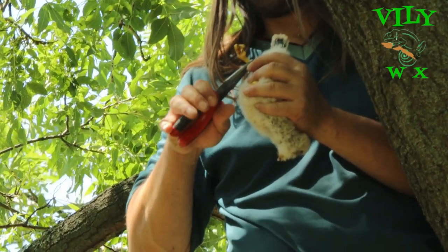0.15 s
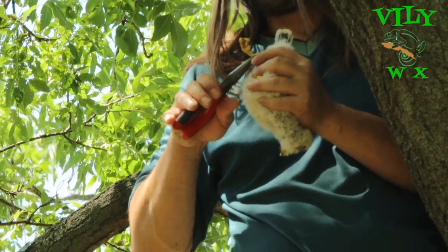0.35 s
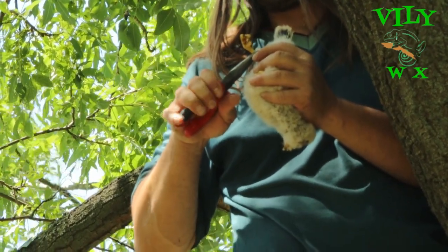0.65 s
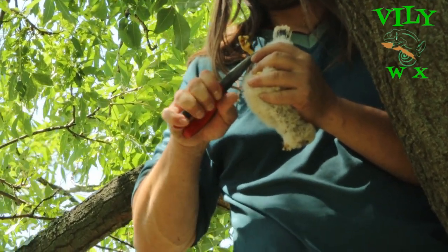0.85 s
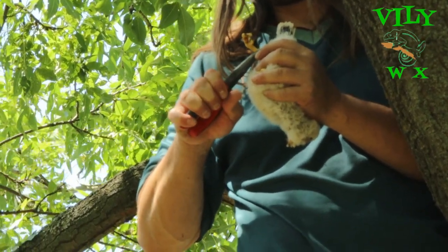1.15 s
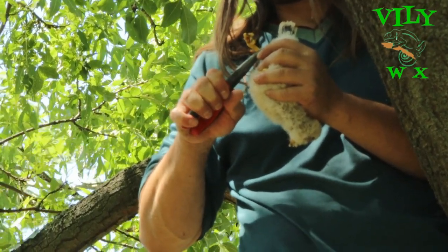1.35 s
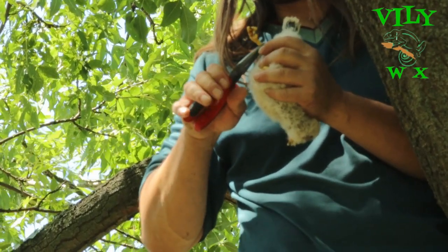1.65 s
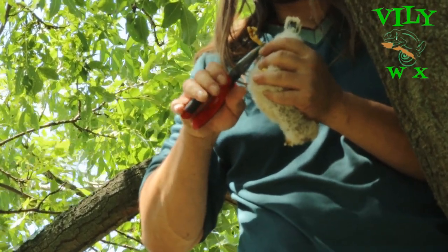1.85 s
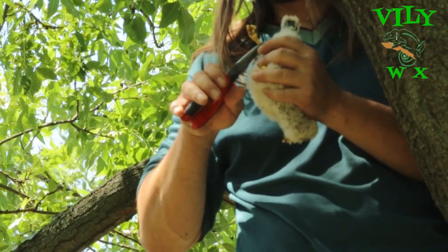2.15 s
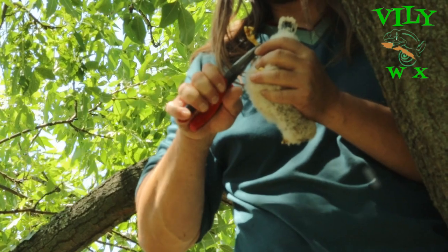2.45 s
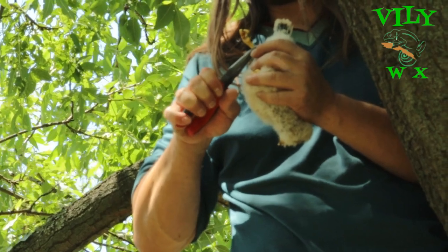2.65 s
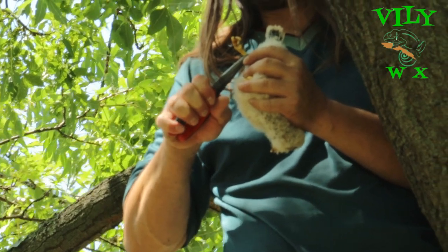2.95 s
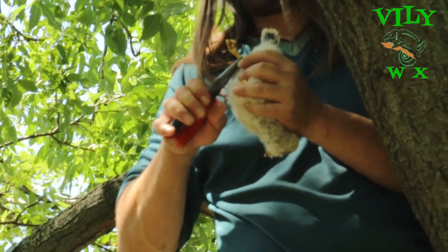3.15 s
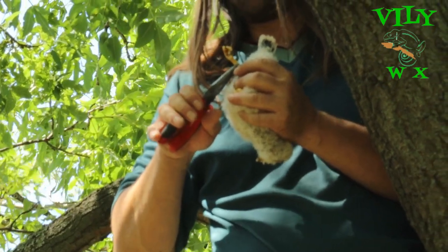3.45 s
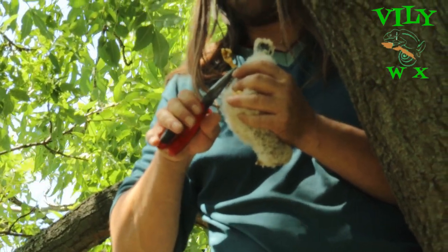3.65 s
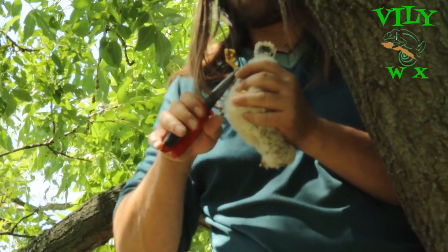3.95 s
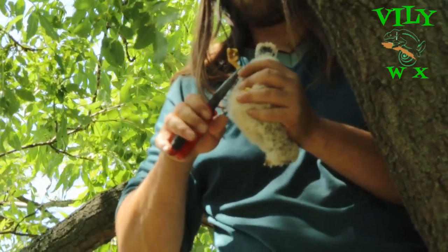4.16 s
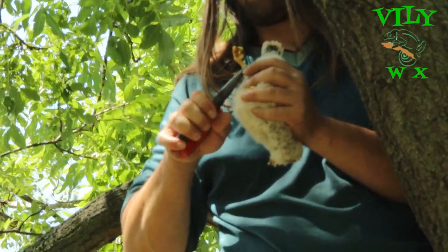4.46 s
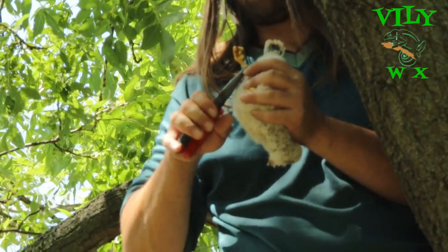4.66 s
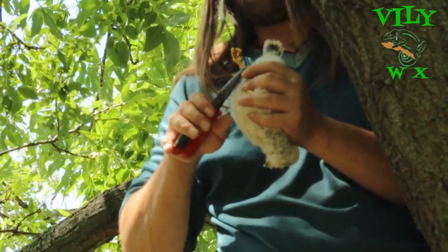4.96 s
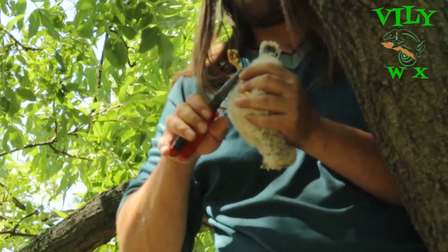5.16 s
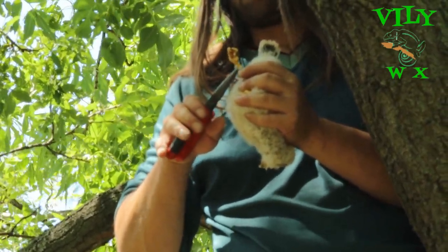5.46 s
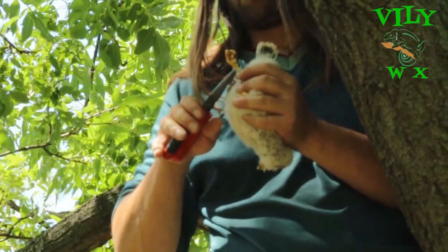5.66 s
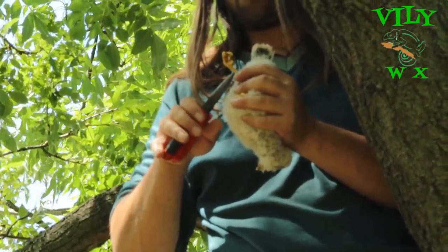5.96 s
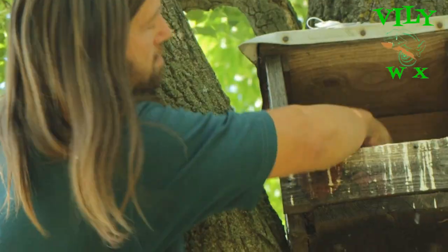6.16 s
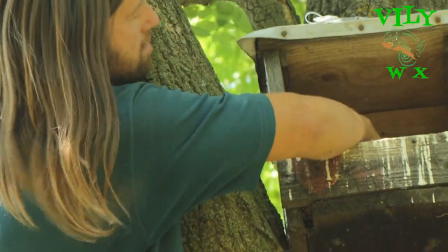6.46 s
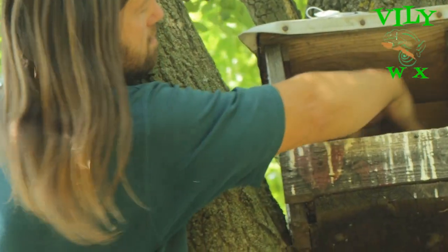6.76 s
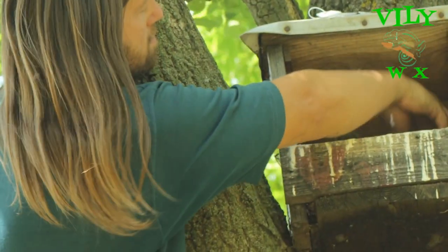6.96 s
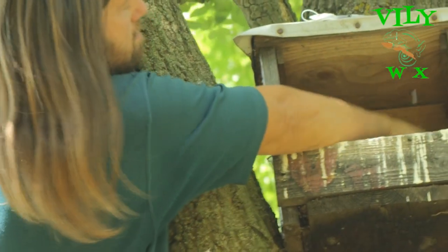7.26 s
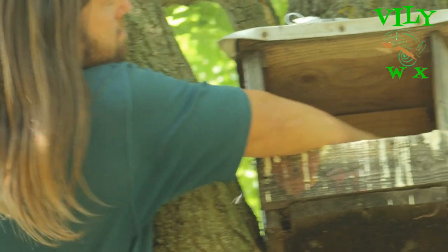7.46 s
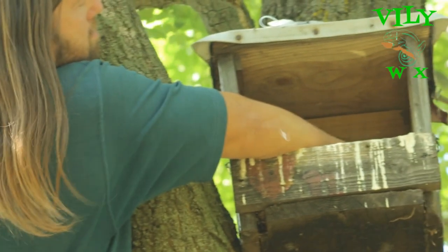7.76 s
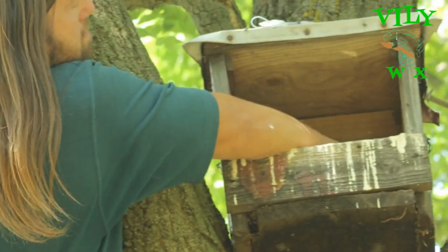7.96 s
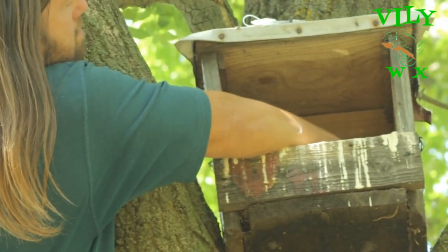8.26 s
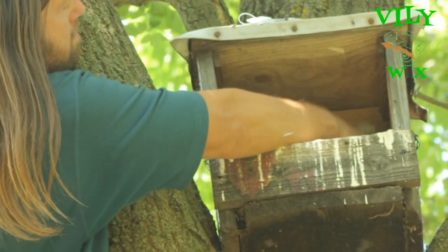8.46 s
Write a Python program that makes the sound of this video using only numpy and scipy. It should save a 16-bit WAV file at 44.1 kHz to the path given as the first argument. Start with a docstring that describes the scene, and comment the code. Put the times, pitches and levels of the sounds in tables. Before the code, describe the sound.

Rapid shrill squeals from a handled raptor chick, in separate runs with quiet gaps, amid faint rustle, taps, microphone gusts and steady summer insect hiss.

```python
"""Kestrel chicks in a tree

Two chicks squeal in short runs while handled at a nest box: harmonics slide up low, break into a high arch, fall back.
Echoes and decaying noise are the trunk and canopy. Ringing modes, noise bursts and slips are the taps, bark and cloth.
Gated low noise and single pulses are gusts on the microphone. Shaped noise gives a wavering insect hiss, open air,
a faint whine, and a faint treble hiss, mostly 13-16 kHz, that pulses quickly and dips unevenly.
"""
import sys
import numpy as np
from scipy import signal
from scipy.fft import rfft, irfft, next_fast_len
from scipy.io import wavfile
from scipy.ndimage import uniform_filter1d

SR = 44100
rng = np.random.default_rng(int(sys.argv[2]) if len(sys.argv) > 2 else 0)


def store_wav(level_fs):
    """Save 16-bit WAV to argv[1]."""
    pcm = np.round(np.clip(np.atleast_2d(level_fs), -1, 1) * 32767)
    wavfile.write(sys.argv[1], SR, pcm.T.astype(np.int16))


N = 379701
TIME = np.arange(N) / SR
CUTOFF_HZ = 15900


def from_db(db):
    """Decibels to gain."""
    return 10 ** (np.asarray(db) / 20)


def rms_one(x):
    """Scale to unit power."""
    return x / np.sqrt(np.mean(x ** 2) + 1e-20)


def along(rows, t):
    """Each column of a curve, read at times t."""
    s, *columns = np.transpose(rows)
    return [np.interp(t, s, c) for c in columns]


def at_hz(points, hz):
    """A spectrum read on a log-frequency axis."""
    f, value = np.transpose(points)
    return np.interp(np.log(np.maximum(hz, 1)), np.log(f), value)


def panned(x, pan_db):
    """Place a sound between left and right at constant power; positive leans left."""
    ratio = from_db(pan_db)
    return np.array([x * ratio, x]) * np.sqrt(2 / (1 + ratio ** 2))


def drift(rate, size):
    """Random wander about zero: straight lines between normal draws, rate draws a second."""
    steps = np.arange(size) * rate / SR
    knots = np.random.default_rng(rng.integers(2 ** 31)).standard_normal(int(steps[-1]) + 2)
    return np.interp(steps, np.arange(len(knots)), knots)


def coloured(x, spectrum):
    """Give a sound a spectrum; unit power."""
    size = 2 ** 19
    gain = from_db(at_hz(spectrum, np.fft.rfftfreq(size, 1 / SR)))
    return rms_one(irfft(rfft(x, size) * gain)[..., :N])


def course(t, width_s, break_s, drop_s, low_share, lowest_share, low_db, swell_db, release_db_per_s):
    """One arch of tension gives the share of the top pitch and the level in dB, t seconds from the top."""
    tension = 1 / (1 + (t / width_s) ** 2)
    # the high register holds from break_s before the top to drop_s after it
    low = uniform_filter1d(1.0 * ((t < -break_s) | (t > drop_s)), size=60)
    share = np.maximum(tension * (1 - low * (1 - low_share)), lowest_share)
    release_db = release_db_per_s * np.maximum(t - drop_s, 0)
    return share, swell_db * (tension - 1) + low_db * low - release_db


ONSET_JITTER = .07  # share of the pitch
HOARSE_BELOW_HZ, HOARSE_DB_PER_HZ = 1900, .06  # calls that fall short of this pitch flutter more
LOW_OCTAVE_DB = -6  # even harmonics in the low register


def chick(calls, arch, throat, jitter, low_jitter, wander, shimmer_db, rasp_db, slack_db, lag_ms):
    """Harmonics of the syrinx sweep through a fixed throat resonance; the low register is the rougher."""
    out = np.zeros((2, N))
    for s, pitch_hz, level_db, length, lift_db, pan_db in calls:
        span = np.flatnonzero(abs(TIME - round(s, 2)) < .08)
        size = len(span)
        t = (TIME[span] - s) / length
        share, swell_db = course(t, **arch)
        # away from the top of the arch the membrane is slack and flutters more
        slack = np.clip((.99 - share) / .1, 0, 1)
        hoarse = from_db(HOARSE_DB_PER_HZ * np.clip(HOARSE_BELOW_HZ - pitch_hz, 0, 100))
        flutter = (jitter * hoarse + low_jitter * slack) * drift(1400, size)
        unsteady = flutter + wander * drift(90.0, size)
        # the voice starts as a croak before it settles on a pitch
        croak = np.clip(-t / arch["break_s"] - 1.3, 0, 1)
        f0 = pitch_hz * share * (1 + unsteady + ONSET_JITTER * croak * drift(2200, size))
        phase = 2 * np.pi * np.cumsum(f0) / SR
        voice = 0
        for k in range(1, 11):
            overtone = np.clip((k * f0 - 4500) / 1000, 0, 1)
            gain_db = at_hz(throat, k * f0) + overtone * (lift_db + slack_db * slack)
            gain_db = gain_db + shimmer_db * (1 + overtone) * drift(418.8, size)
            # the low register favours odd harmonics
            gain_db = gain_db + LOW_OCTAVE_DB * (k % 2 == 0) * (share < .8)
            gain = from_db(gain_db) * (k * f0 < CUTOFF_HZ)
            # the strong low partials carry the direction, the overtones sit in the middle
            late = 2 * np.pi * k * f0 * lag_ms / 1000 * (1 - overtone)
            partial = np.array([np.sin(k * phase - late), np.sin(k * phase)])
            voice = voice + partial * panned(gain, pan_db * (1 - overtone))
        fade = signal.windows.tukey(size, .4)
        out[:, span] += np.sqrt(2) * voice * from_db(level_db + swell_db) * fade
    # turbulent air hisses through the same throat for as long as the voice sounds
    effort = np.sqrt(np.maximum(uniform_filter1d(out ** 2, size=300), 0))
    return out + from_db(rasp_db) * effort * coloured(rng.standard_normal((2, N)), throat)


# squeals of the nearer chick: (time of the arch top [s], top pitch before flutter [Hz], relative level [dB],
# length factor [ratio], overtone lift [dB], left over right [dB])
NEAR_CALLS = [(.022, 1840, -35, 1.16, 2, -3), (.124, 1906, -21, .95, -1.5, -3),
              (.380, 1900, -20.5, 0.87, -4, -1), (1.760, 1893, -22.5, 1.06, 1.5, -2.5),
              (1.950, 1833, -24, 0.99, -4, -3), (2.217, 1804, -22.5, .9, -6, -2),
              (2.742, 1740, -47, 1, -5, 0), (4.267, 1808, -25, 1.06, 0.5, -2),
              (4.440, 1862, -21.5, 1.0, 0, -5), (4.652, 1808, -23, .9, -2.5, -2),
              (4.917, 1833, -22.5, 0.98, -2.5, -4), (5.118, 1877, -21.5, 1.01, -2.5, -4),
              (5.365, 1843, -22.5, 1.04, 0, -3), (6.247, 1927, -23, 0.99, 1, -3.5),
              (6.448, 1942, -21.5, 1.15, -1, -2), (6.637, 1968, -22, 1.1, 1, -1),
              (6.916, 1833, -23.5, 1.24, -4.5, -1), (7.812, 1968, -20.5, 1.11, 1, -4),
              (8.005, 1914, -20.5, 1.01, -1.5, -3), (8.232, 1903, -20.5, 1.3, 0, -1.5),
              (8.563, 1924, -22, 1.21, 3, -3)]
# its tension arch, before the length factor: widths [s], pitch shares [ratio], levels [dB], release [dB/s]
NEAR_ARCH = dict(width_s=.071, break_s=.017, drop_s=.025, low_share=.72, lowest_share=.48, low_db=0, swell_db=62, release_db_per_s=1200)
# its throat and beak resonance: (frequency [Hz], relative gain [dB])
NEAR_THROAT = [(1000, -24), (1900, -23), (2500, -11.5), (3100, -5), (3600, -2), (4000, 3), (4700, -7.5),
               (5700, -19), (7600, -10), (9500, -18), (11500, -23.5), (14000, -32)]


def near_chick():
    """The strong voice: its overtones weaken when the membrane is slack."""
    return chick(NEAR_CALLS, NEAR_ARCH, NEAR_THROAT, jitter=.0055, low_jitter=0.019, wander=0.0042,
                 shimmer_db=2.0, rasp_db=-15, slack_db=-6, lag_ms=0.088)


# squeals of the second chick: (time of the arch top [s], top pitch before flutter [Hz], relative level [dB],
# length factor [ratio], overtone lift [dB], left over right [dB])
THIN_CALLS = [(3.735, 2120, -37.5, 1.3, 0, -1), (3.877, 2150, -37, 1.02, 0, 5),
              (4.033, 2216, -38, 0.96, 0, 4), (4.186, 2220, -37.5, 1.03, 0, 1.5),
              (4.350, 2127, -44, 0.97, 0.009, 5), (4.512, 2190, -42, 1.17, 0, 8),
              (4.680, 2127, -43.5, 0.99, 0, 3), (4.875, 2195, -46.5, 0.97, 0, 18),
              (7.958, 2110, -40, 0.99, 0, -1), (8.125, 2150, -46.5, 1.1, 0, 6),
              (8.460, 2167, -45, 1.6, 0, 0)]
# its tension arch, before the length factor: widths [s], pitch shares [ratio], levels [dB], release [dB/s]
THIN_ARCH = dict(width_s=.047, break_s=.019, drop_s=.022, low_share=.85, lowest_share=.58, low_db=-1.5, swell_db=41.5, release_db_per_s=2500)
# its throat and beak resonance: (frequency [Hz], relative gain [dB])
THIN_THROAT = [(1200, -5), (2100, -1), (2800, 7), (3500, 12), (4300, 8.5), (5200, -6), (6400, -7),
               (8500, -13), (11000, -37), (14000, -52)]


def thin_chick():
    """A thinner, higher voice: its overtones gain a little when the membrane is slack."""
    return chick(THIN_CALLS, THIN_ARCH, THIN_THROAT, jitter=.0032, low_jitter=0.0043, wander=0.0041,
                 shimmer_db=2.5, rasp_db=-23, slack_db=2, lag_ms=-0.19)


def off_axis(x, loss_db):
    """The beak beams its overtones away, so they arrive mostly by reflection."""
    body = signal.sosfiltfilt(signal.butter(4, 5200, fs=SR, output="sos"), x)
    return body + from_db(loss_db) * (x - body)


# echoes off trunk, box and limbs: (left delay [ms], right delay [ms], level [dB])
ECHOES = [(2.9, 3.0, -21), (6.7, 6.4, -20), (12.3, 12.8, -20), (19.4, 18.7, -21), (31, 29.5, -21),
          (43, 45, -23)]
CANOPY_DB, CANOPY_T60_S = -12.5, .22  # scatter from the leaves
FAR_DB, FAR_T60_S = -19.5, .65  # far tail


def tree(x):
    """A few echoes off nearby wood, dense scatter from the leaves and a faint far tail."""
    t = np.arange(SR) / SR
    response = np.zeros((2, SR))
    for level_db, t60 in (CANOPY_DB, CANOPY_T60_S), (FAR_DB, FAR_T60_S):
        build_up = 1 - np.exp(-t / 0.04)
        scatter = rng.standard_normal((2, SR)) * from_db(-60 * t / t60) * build_up
        response += from_db(level_db) * rms_one(scatter) / np.sqrt(SR)
    for left_ms, right_ms, level_db in ECHOES:
        delays = [int(left_ms * SR / 1000), int(right_ms * SR / 1000)]
        response[[0, 1], delays] += from_db(level_db)
    return signal.fftconvolve(x, response, axes=1)[:, :N]


# handling taps: (time [s], relative peak [dB], left over right [dB])
TAPS = [(3.49, -44, 9), (3.71, -38.5, 8), (4.836, -46, 7), (4.875, -53, 2), (4.949, -41, 11),
        (5.721, -23, 9), (6.376, -44, 9)]
# ringing modes of a tap: (frequency [Hz], relative level before random spread [dB], t60 [s])
TAP_MODES = [(260, -15, 0.02), (450, -4, 0.031), (890, 0, 0.0093), (1230, 3, 0.013), (1610, -1, 0.0078),
             (2580, -14, 0.0041), (5800, -6.5, 0.0029)]


def taps(trim_db):
    """Dry contacts: damped modes, each tap struck slightly differently, that die within a few cycles."""
    out, t = np.zeros((2, N)), np.arange(SR // 20) / SR
    for s, peak_db, pan_db in TAPS:
        ring = 0
        for k, (hz, db, t60) in enumerate(TAP_MODES):
            decay = from_db(db + 2 * rng.normal() - 60 * t / t60)
            ring = ring + decay * np.sin(2 * np.pi * hz * t) * (-1) ** k
        at = round(s * SR)
        out[:, at:at + len(t)] += panned(from_db(peak_db + trim_db) * ring / abs(ring).max(), pan_db)
    return out


# sharp ticks of bark: (time [s], peak [dB])
TICKS = [(1.536, -27), (3.489, -27), (4.952, -21.5)]


def ticks(t60_s):
    """Bits of bark snap in bright, very short noise bursts."""
    envelope = 0
    for s, peak_db in TICKS:
        envelope = envelope + from_db(peak_db - 60 * abs(TIME - s) / t60_s) * (TIME >= s)
    return envelope * rng.uniform(-1, 1, N)


# cloth rubs on bark: (time at the middle [s], half length [s], level [dB])
RUBS = [(3.347, 0.15, -55), (4.836, 0.16, -52.5), (6.38, .04, -46.5)]
# faint rustle between the rubs: (time [s], level [dB])
FIDGET = [(0, -77), (4.6, -58.5), (8.61, -55)]
# colour of the cloth: (frequency [Hz], relative level [dB])
RUB = [(200, -18), (400, 2.5), (750, 1.5), (1400, -11), (3000, -10), (9000, -26)]


def rustle(grains_per_s, grain_db):
    """Cloth catches on bark in tiny uneven slips; each rub swells and fades."""
    strength = from_db(grain_db * np.minimum(rng.exponential(1, N), 4))
    slips = (rng.random(N) < grains_per_s / SR) * strength
    force = from_db(along(FIDGET, TIME)[0])
    for s, half_s, db in RUBS:
        force = force + from_db(db) * np.exp(-((TIME - s) / half_s) ** 2)
    return force * coloured(slips * rng.standard_normal((2, N)), RUB)


# gusts, mostly stronger in one port: (start [s], length [s], relative level [dB], left over right [dB])
GUSTS = [(0.0, 0.11, -28, 16), (.14, .06, -38.5, 10), (0.359, 0.13, -39, 3), (.61, 0.017, -48, -1),
         (0.732, 0.23, -40, 5.5), (0.976, 0.13, -46, 19), (1.70, 0.36, -47, -14), (1.802, 0.15, -42, -19),
         (2.278, 0.022, -47, -11), (2.599, 0.2, -42, -19), (2.908, 0.15, -38, -18),
         (3.191, 0.027, -47.5, -18), (3.908, 0.053, -40.5, -18), (4.028, 0.049, -39.5, -15),
         (4.277, 0.057, -46, -23), (5.98, 0.028, -51, 18), (6.244, 0.66, -58, 11), (6.921, 0.28, -46.5, 3),
         (7.45, 0.13, -55, -10), (7.792, .04, -45, -8), (7.924, 0.68, -54, 13)]
# colour of the turbulence: (frequency [Hz], relative level [dB])
WIND = [(15, -44), (25, -11), (64, 1), (118, 3.5), (172, -2), (367, -18.5), (430, -16.5), (512, -30),
        (600, -38), (780, -55), (1320, -120)]
# single buffets: (time [s], relative peak [dB], pitch [Hz], left over right [dB])
BUFFETS = [(0.016, -20.5, 168, 18.5), (0.06, -9, 129, 23), (0.52, -27.5, 170, 11), (0.916, -28.5, 153, 10),
           (0.954, -28, 135, 19), (1.884, -24, 145, -22), (7.13, -23, 134, -20)]
GUST_ATTACK_S, GUST_RELEASE_S = 0.01, 0.013


def wind(lump_db, low_cut_hz):
    """Gusts rise, hold and die as lumpy turbulence on each port, with single eddies that push and then pull."""
    power = np.zeros((2, N))
    for s, length_s, level_db, pan_db in GUSTS:
        # zero or less inside the gust, growing outside it
        outside = np.maximum((s - TIME) / GUST_ATTACK_S, (TIME - s - length_s) / GUST_RELEASE_S)
        power += panned(from_db(level_db) * np.exp(-np.clip(outside, 0, 20)), pan_db) ** 2
    own, shared = rng.standard_normal((2, N)), rng.standard_normal(N)
    lumps = from_db(lump_db * drift(60, N))
    out = np.sqrt(power) * coloured((own + 0.54 * shared) * lumps, WIND)
    for s, peak_db, hz, side_db in BUFFETS:
        u = 2 * np.pi * hz * (TIME - s)
        out += panned(-from_db(peak_db) * u * np.exp((1 - u ** 2) / 2), side_db)
    return signal.sosfilt(signal.butter(2, low_cut_hz, "high", fs=SR, output="sos"), out)


# stereo balance of the surroundings: (frequency [Hz], left over right [dB])
LEAN = [(60, -3.5), (150, 1), (380, -4.5), (950, 12), (2380, -2.5), (5980, -2.5), (15000, 1.5)]
# stereo spread of the surroundings: (frequency [Hz], side minus mid [dB])
WIDTH = [(60, -17), (99, -5), (160, -6.5), (270, -7.5), (450, -5.5), (740, 4.5), (1220, 1), (2010, 6.5),
         (3330, 0.5), (5500, 3.5), (9080, -11.5), (15000, -18.5)]


def ambient(spectrum):
    """Steady stereo noise arriving from all round; unit power."""
    size = next_fast_len(N)
    hz = np.fft.rfftfreq(size, 1 / SR)
    mid, side = rfft(rng.standard_normal((2, size)))
    width = from_db(at_hz(WIDTH, hz))
    pair = np.array([mid + width * side, mid - width * side]) / np.sqrt(1 + width ** 2)
    tilt = panned(from_db(at_hz(spectrum, hz)), at_hz(LEAN, hz))
    return rms_one(irfft(pair * tilt, size)[:, :N])


# colour of the treble hiss: (frequency [Hz], relative density [dB])
TREBLE_HISS = [(9000, -53), (11500, -21), (12700, -12.5), (14000, 0.5), (15500, 2), (16000, -2)]
DIP_UNEVEN = .2  # share of the dip rate


def treble_hiss(level_db, dips_per_s, dip_db, pulses_per_s, pulse_depth, waver_db):
    """A faint treble hiss, mostly 13-16 kHz, that pulses quickly and dips unevenly."""
    dips = np.cumsum(dips_per_s * (1 + DIP_UNEVEN * drift(5.1, N))) / SR
    pulses = np.cumsum(pulses_per_s * (1 + 0.016 * drift(2.7, N))) / SR
    dip = (.5 + .5 * np.cos(2 * np.pi * dips)) ** 5
    swing = from_db(waver_db * drift(28, N) - dip_db * dip)
    swing = swing * (1 + pulse_depth * np.cos(2 * np.pi * pulses))
    return from_db(level_db) * rms_one(swing * ambient(TREBLE_HISS))


# colour of the insect hiss: (frequency [Hz], relative density [dB])
INSECTS = [(3000, -24), (3700, -6.5), (4300, 6.5), (5000, 7), (5500, 0), (6100, -6.5), (7500, -9),
           (9000, -12.5), (11000, -13.5), (16000, -15)]


def insects(level_db, waver_db):
    """A high band of noise like summer insects, steady but for a gentle waver in level."""
    return from_db(level_db + waver_db * drift(25, N)) * ambient(INSECTS)


# faint distant whine: (frequency [Hz], width [Hz], level [dB])
DRONE = [(335.3, 116, -62.5), (621, 61, -61), (1152, 21, -67.5)]


def whine():
    """Noise through narrow resonances, the same on both sides."""
    out = np.zeros(N)
    for hz, width_hz, level_db in DRONE:
        b, a = signal.iirpeak(hz, hz / width_hz, SR)
        out += from_db(level_db) * rms_one(signal.lfilter(b, a, rng.standard_normal(N)))
    return out


# colour of the outdoor air: (frequency [Hz], relative density [dB])
AIR = [(18, -37), (30, -13), (69, -4), (298, -5.5), (342, 3), (378, -6.5), (479, -6), (608, -3), (684, -9),
       (1080, -10), (1170, -4.5), (1340, -13), (2290, -4), (3400, -10), (4420, -48), (7480, -120)]


def open_air(level_db):
    """The outdoor floor: steady, mostly low noise."""
    return from_db(level_db) * ambient(AIR)


# random flutter of the echoes and tail: depth, draws per second
TAIL_FLUTTER_DB, TAIL_FLUTTER_RATE = 2.5, 380


def scene():
    """Both chicks in the tree, with handling, wind, insects, treble hiss and the outdoor floor."""
    voices = near_chick() + thin_chick()
    # the reflections come back broken and fluttering
    wander = np.array([drift(TAIL_FLUTTER_RATE, N), drift(TAIL_FLUTTER_RATE, N)])
    flutter = from_db(TAIL_FLUTTER_DB * wander)
    birds = off_axis(voices, loss_db=-10.5) + flutter * tree(voices)
    handling = taps(trim_db=4.0) + ticks(t60_s=0.0055) + rustle(grains_per_s=1100, grain_db=2.5)
    gusts = wind(lump_db=4.0, low_cut_hz=50)
    treble = treble_hiss(level_db=-44.5, dips_per_s=7.2, dip_db=4.5, pulses_per_s=71,
                         pulse_depth=0.26, waver_db=2.0)
    background = insects(level_db=-43.19, waver_db=1.5) + whine() + open_air(level_db=-48.64)
    return birds + handling + gusts + treble + background


def record(dry):
    """The stereo image narrows in the treble, and the top is cut steeply."""
    mid, side = dry.mean(0), (dry[0] - dry[1]) / 2
    soft_side = signal.sosfiltfilt(signal.butter(3, 7000, fs=SR, output="sos"), side)
    side = .55 * soft_side + .45 * side
    top_cut = signal.ellip(12, .1, 80, CUTOFF_HZ, fs=SR, output="sos")
    return signal.sosfilt(top_cut, np.array([mid + side, mid - side]))


dry = scene()
out = record(dry)
store_wav(out)
```